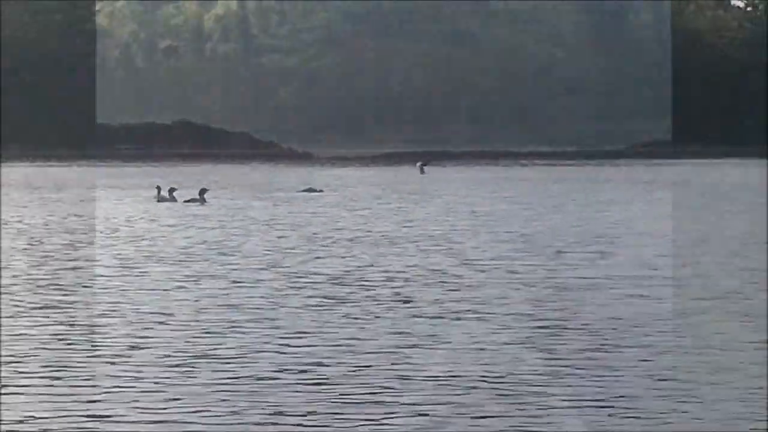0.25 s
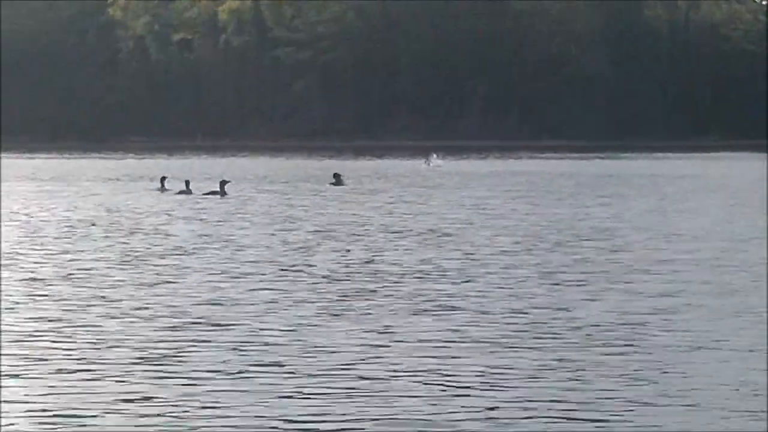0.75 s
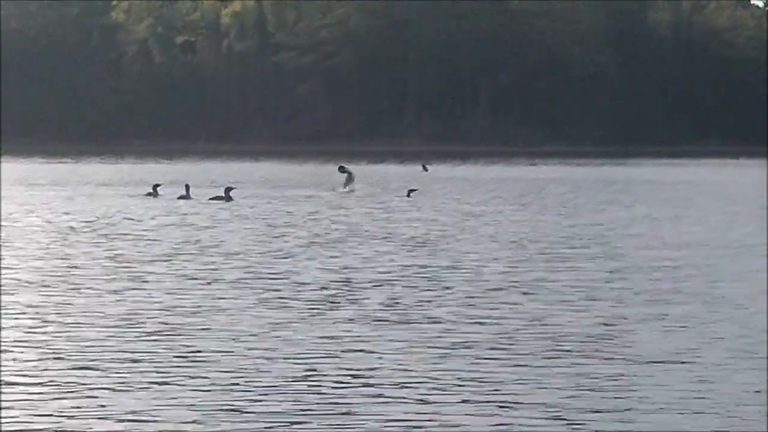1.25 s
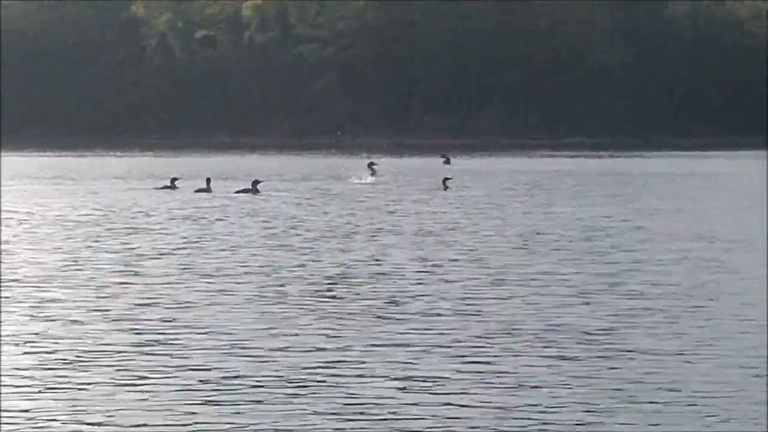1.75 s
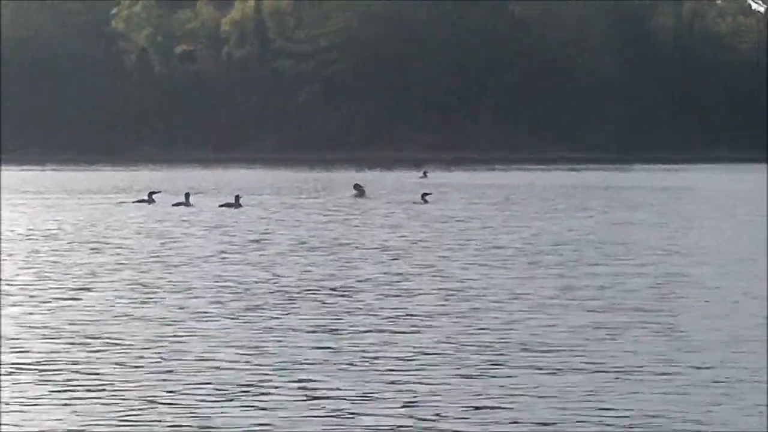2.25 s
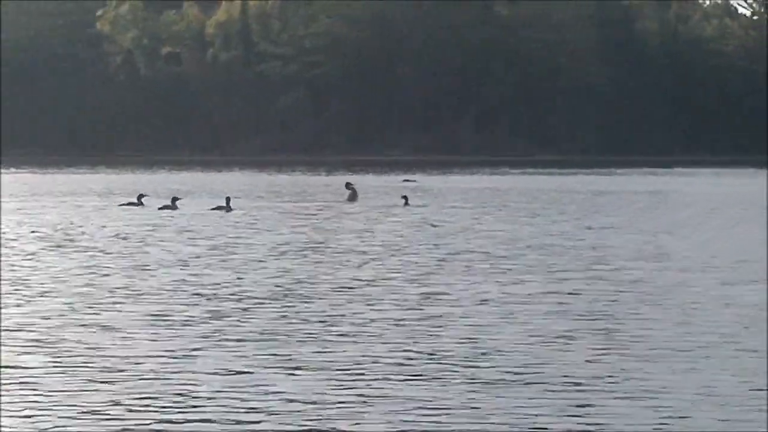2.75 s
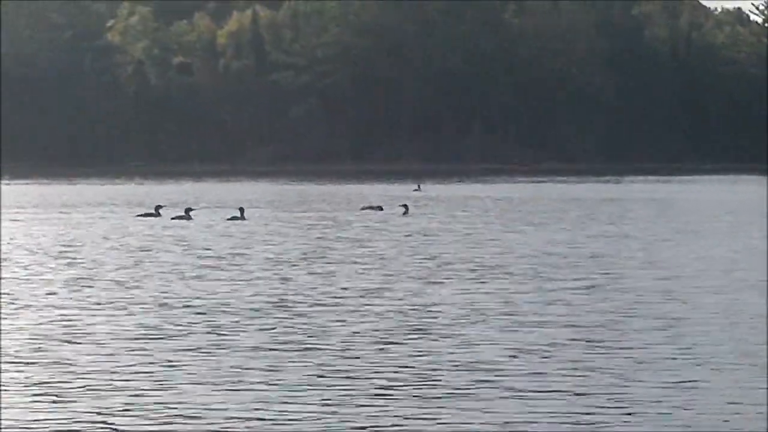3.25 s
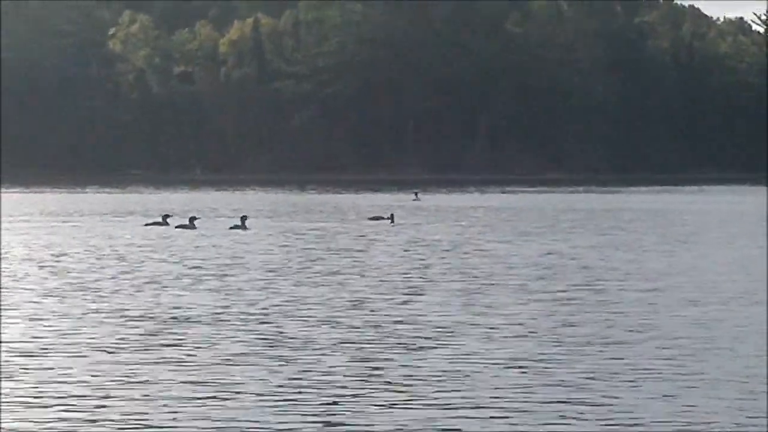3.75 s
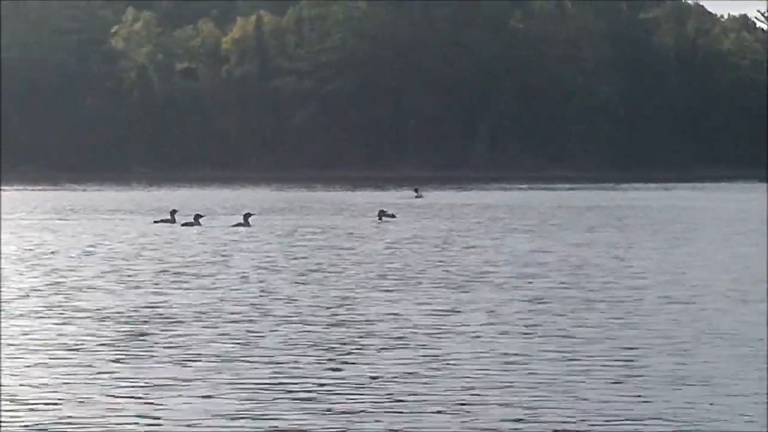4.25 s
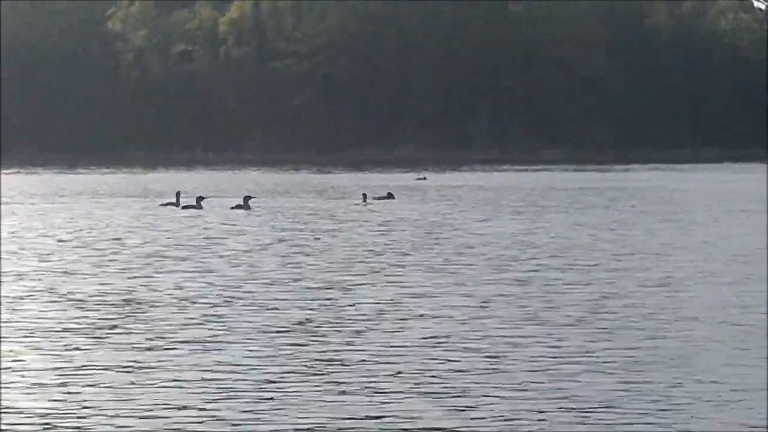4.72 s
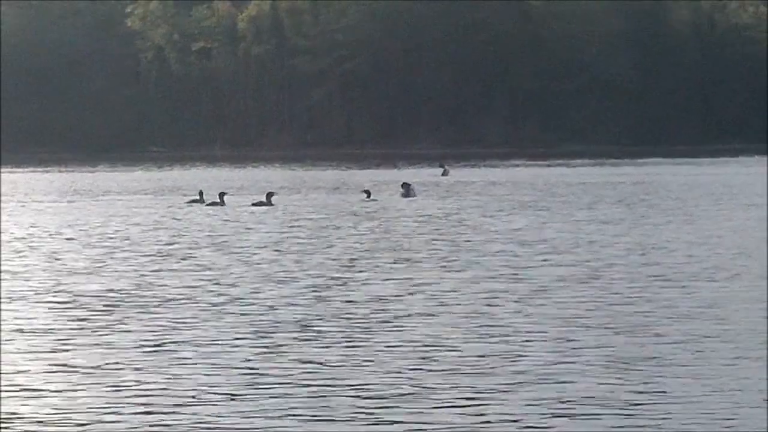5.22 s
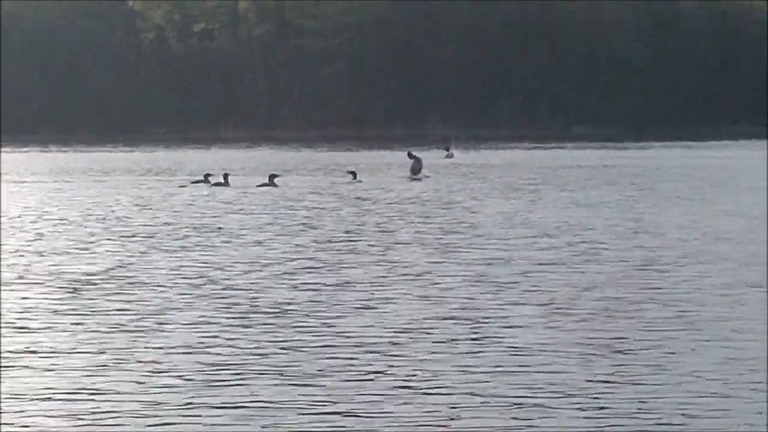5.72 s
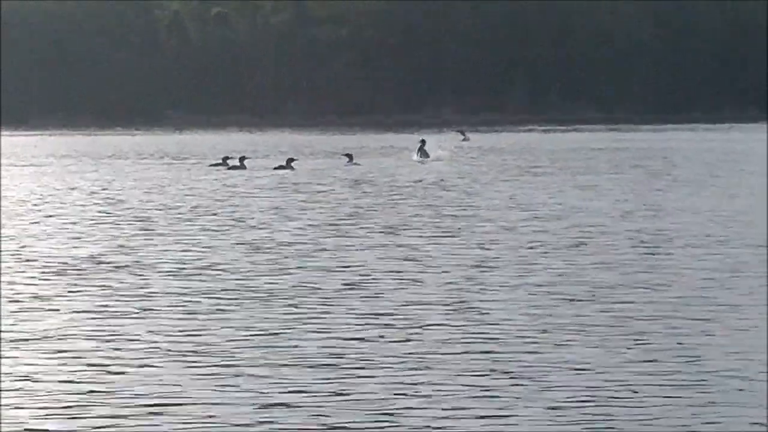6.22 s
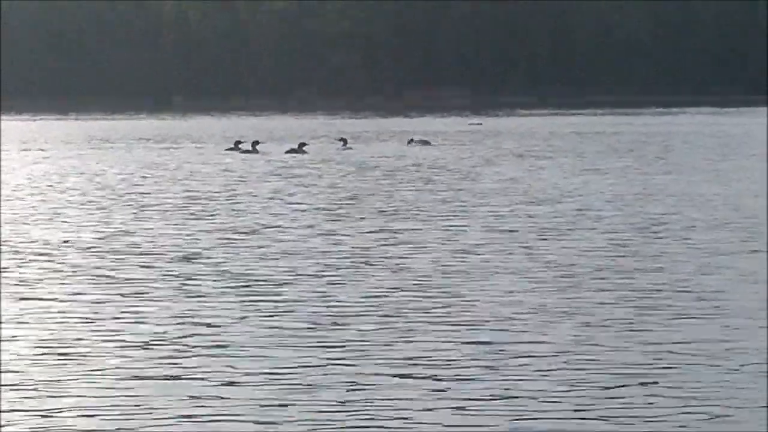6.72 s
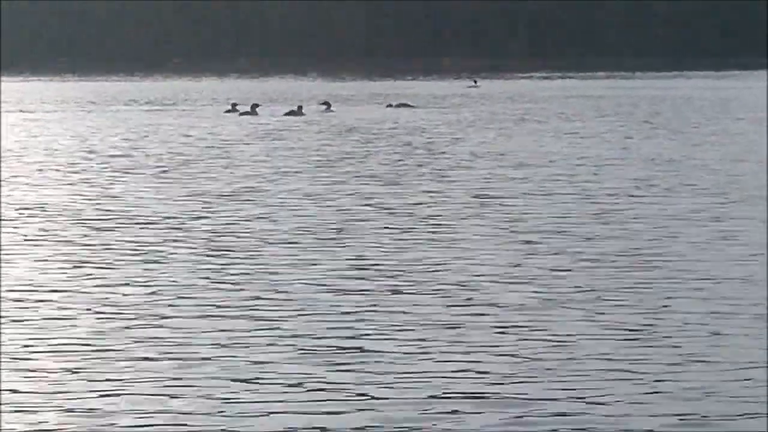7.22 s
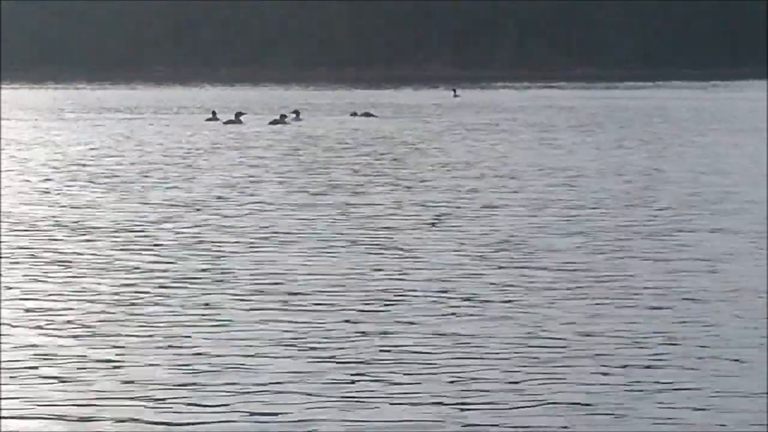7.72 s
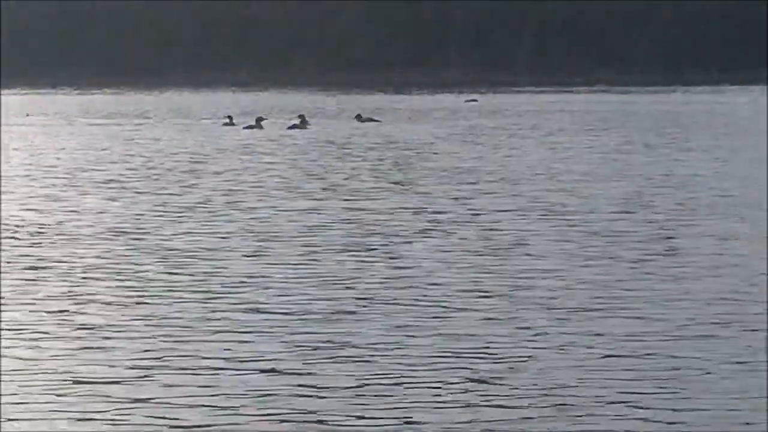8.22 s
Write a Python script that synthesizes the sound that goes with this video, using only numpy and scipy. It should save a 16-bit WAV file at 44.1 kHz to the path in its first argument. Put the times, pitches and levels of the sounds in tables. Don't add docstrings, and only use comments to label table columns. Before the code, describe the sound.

A brief trickle of water, then distant loons on a lake give quavering, yelping tremolo laughs around 900 to 1400 hertz. Wooded shores return a blurred echo. One bird slaps the water with small hollow knocks; after a short lull, louder rattling laughs overlap while wind thumps the outdoor microphone. More slaps follow, the calls thin out to faint high notes, and hiss with tiny creaks fades away.

```python
import sys
import numpy as np
from scipy import signal
from scipy.fft import rfft, irfft, next_fast_len
from scipy.io import wavfile
from scipy.ndimage import uniform_filter1d, map_coordinates

SR = 44100
rng = np.random.default_rng(int(sys.argv[2]) if len(sys.argv) > 2 else 0)


def materialize(psi):
    bounded = np.clip(np.atleast_2d(psi).T, -1, 1)
    quanta = np.round(bounded * 32767).astype(np.int16)
    wavfile.write(sys.argv[1], SR, quanta)


def level_to_linear(level):
    exponent = np.asarray(level, float) / 20
    return 10 ** exponent


N = 373682
TIME = np.arange(N) / SR


def loons():
    # [t/s, register name]
    laughs = [
        ([(.1, 879.5, 955, -54), (.182, 870, 1070, -51), (.266, 912, 1200, -56.5), (.352, 940, 1195, -50), (.448, 894, 1095, -52.5), (.55, 947, 1180, -47), (.657, 942, 1224, -45.5), (.752, 928, 1170, -47.5), (.85, 943, 1140, -46.5), (.945, 990, 1195, -53)], [(.134, "low"), (.311, "mid"), (.35, "low"), (.39, "mid"), (.445, "low"), (.589, "mid"), (.781, "high"), (.935, "mid"), (.995, "rest")]),
        ([(.36, 1090, 1250, -47), (.45, 1086, 1340, -54.5), (.542, 1070, 1310, -47), (.64, 1090, 1320, -53.5), (.73, 1090, 1300, -54), (.83, 1117, 1320, -54.5), (.965, 863, 1015, -46.5)], [(.425, "high"), (.457, "mid"), (.482, "high"), (.9, "rest"), (.987, "mid"), (1.046, "rest")]),
              ([(2.415, 980, 995, -48.5), (2.51, 897, 1240, -47), (2.605, 1044, 1335, -47.5), (2.702, 1048, 1335, -46.5), (2.801, 1003, 1325, -46), (2.899, 996, 1315, -48), (3.001, 967, 1280, -49.5), (3.115, 952, 850, -52.5)], [(2.446, "low"), (2.558, "mid"), (2.679, "high"), (2.706, "mid"), (2.748, "high"), (2.804, "mid"), (2.843, "high"), (2.901, "mid"), (2.943, "high"), (3.003, "mid"), (3.068, "high"), (3.097, "mid"), (3.116, "rest"), (3.13, "low"), (3.19, "rest")]),
        ([(3.68, 963, 1035, -50), (3.757, 956, 1215, -42.5), (3.835, 1035, 1345, -45.5), (3.93, 1040, 1320, -46.5), (4.024, 1050, 1305, -45.5), (4.12, 1070, 1310, -44), (4.218, 1052, 1285, -46.5), (4.33, 984, 1092, -47)], [(3.708, "low"), (3.793, "mid"), (3.884, "high"), (3.94, "mid"), (3.966, "high"), (4.234, "mid"), (4.255, "high"), (4.325, "mid"), (4.426, "rest")]),
        ([(3.76, 984, 1240, -47.5)], [(3.768, "mid"), (3.831, "rest")]),
              ([(4.36, 940, 1020, -46.5), (4.452, 884, 1250, -46), (4.547, 914, 1195, -38), (4.642, 920.6, 1220, -39), (4.735, 895, 1150, -39), (4.835, 869, 1020, -43.5), (4.94, 828, 900, -54.5)], [(4.4, "low"), (4.508, "mid"), (4.936, "low"), (4.977, "rest")]),
              ([(4.98, 915, 1131, -45), (5.064, 975, 1239, -46.5), (5.149, 975, 1300, -44), (5.24, 990, 1273, -47), (5.332, 940, 1135, -43.5), (5.43, 875, 840, -51)], [(4.982, "low"), (5.113, "mid"), (5.238, "low"), (5.289, "mid"), (5.333, "low"), (5.472, "rest")]),
        ([(5.075, 1080, 1398, -44), (5.152, 1040, 1310, -47), (5.243, 1045, 1314, -44), (5.335, 1075, 1322, -46.5), (5.432, 1040, 1294, -46), (5.535, 1020, 1275, -47.5), (5.652, 950, 1048, -46.5), (5.75, 900, 780, -56)], [(5.09, "low"), (5.138, "rest"), (5.153, "low"), (5.198, "rest"), (5.222, "high"), (5.248, "mid"), (5.275, "high"), (5.542, "mid"), (5.572, "high"), (5.635, "mid"), (5.665, "low"), (5.691, "mid"), (5.746, "low"), (5.772, "rest")]),
              ([(6.01, 880, 1182, -50), (6.097, 950, 1280, -48), (6.193, 1085, 1300, -45)], [(6.022, "low"), (6.055, "mid"), (6.168, "high"), (6.254, "rest")]),
        ([(6.285, 1425, 1495, -56), (6.38, 1430, 1513, -58), (6.47, 1430, 1510, -60)], [(6.287, "high"), (6.555, "rest")]),
        ([(6.575, 1200, 1280, -62)], [(6.566, "mid"), (6.66, "rest")]),
    ]
    # [from t/s, to t/s]
    rattling = [
        (.44, .53),
        (.865, .89),
        (2.7, 3.03),
        (3.7, 5.7),
    ]
    registers = {"low": (.75, 0.2, 0.83, 29, 8), "mid": (1.001, 0.41, 4.2, 4.4, 0.65),
                 "high": (1.24, -9.5, 1.5, -4, 7)}
    ceiling_hz, ceiling_edge = 1599, 23.86
    attack_s, release_s, overlap_s = .01, .016, .007
    upward_accent_db, accent_s = 2.5, .022
    rebound_db = 2.5
    flutter_db = 1.1
    out, patchy_db = np.zeros(N), 3 * wobble(30)

    def strains(t):
        return sum((t > start) & (t < end) for start, end in rattling)

    notes = []
    for strokes, jumps in laughs:
        earlier = [(0, "rest")] + jumps
        for (_, before), (start, register), (end, _) in zip(earlier, jumps, jumps[1:]):
            if register != "rest":
                notes.append((strokes, start, end, before, register))

    for strokes, start, end, before, register in notes:
        ratio, register_db, loss_db, catch_db, rich_db = registers[register]
        t = np.arange(start - attack_s / 4, end + overlap_s, 1 / SR)
        pitch, effort_db, height, near = tremolo(strokes, t)
        pitch = ratio * pitch
        limit = (1 + (pitch / ceiling_hz) ** ceiling_edge) ** (strains(t) / ceiling_edge)
        pitch = uniform_filter1d(pitch / limit, size=250, mode="nearest")
        accent_db = upward_accent_db * (before == "low") * np.exp(-np.abs(t - start) / accent_s)
        effort_db = effort_db + register_db + accent_db + rebound_db * (before == "high")
        effort_db = effort_db - loss_db * (1 - height) - catch_db * near
        ramp = np.minimum((t - t[0]) / attack_s, (t[-1] - t) / release_s)
        fade = np.sin(np.pi / 2 * np.clip(ramp, 0, 1)) ** 2
        strained = np.clip((pitch - 1440) / 70, 0, 1) * strains(t)
        patch_db = patchy_db[round(t[0] * SR):][:len(t)]
        tone = voice(pitch, effort_db, height, rich_db + accent_db + patch_db, strained)
        add(out, t[0], fade * level_to_linear(effort_db) * tone)
    return out * level_to_linear(flutter_db * wobble(45))


def voice(pitch, effort_db, height, rich_db, strained):
    # [f/Hz, level/dB]
    throat = [(600, -7), (800, 0), (950, -1.5), (1200, 8.5), (1320, 7.5), (1420, -1), (1600, 1.5),
              (1800, -4.5)]
    # [f/Hz, level/dB]
    upper = [(1250, -19), (1500, -17), (1700, -2), (1900, -13.5), (2100, -9.5), (2400, -11), (2800, -14),
             (4000, -37)]
    # [multiple of pitch, level/dB]
    overtones = [
        (2, -14.5),
        (3, -25),
    ]
    # [multiple of pitch, level/dB]
    rattle = [
        (0.499, -15),
        (0.752, -1),
        (1.251, -2.5),
        (1.501, -20.5),
    ]
    dull_trough_db = 7.5
    phase = 2 * np.pi * np.cumsum(pitch) / SR
    tone = level_to_linear(along(throat, pitch)) * np.sin(phase)
    rich_db = rich_db - dull_trough_db * (1 - height) + 0.09 * (effort_db + 52)
    for k, level_db in overtones:
        tone += level_to_linear(level_db + rich_db + along(upper, k * pitch)) * np.sin(k * phase)
    for k, level_db in rattle:
        tone += strained * level_to_linear(level_db + along(throat, pitch)) * np.sin(k * phase)
    return tone


def tremolo(strokes, t):
    last_stroke_s, last_sag = .095, .94
    longest_rise_s, catch_s, roundness = 0.04686, 0.0022, 1.7
    s, low_hz, crest_hz, db = np.transpose(strokes)
    s = np.r_[s, s[-1] + last_stroke_s]
    low_hz = np.r_[low_hz, low_hz[-1] * last_sag]
    crest_s = s[:-1] + np.minimum(np.diff(s) / 2, longest_rise_s)
    place = np.interp(t, np.sort(np.r_[s, crest_s]), np.arange(2 * len(s) - 1) / 2)
    height = np.abs(np.sin(np.pi * place)) ** roundness
    base = np.interp(t, s, low_hz)
    top = crest_hz[np.minimum(place.astype(int), len(db) - 1)]
    distance_s = np.min(np.abs(t - s[:, None]), axis=0)
    near = np.exp(-(distance_s / catch_s) ** 2)
    return base + (top - base) * height, np.interp(t, crest_s, db), height, near


def shore(birds):
    # [delay t/s, level/dB]
    returns = [(0, -58), (.03, -40), (.25, -42.5), (.8, -71), (1.1, -38), (1.4, -32.5), (1.8, -43),
               (2.2, -37), (2.6, -60)]
    # [f/Hz, level/dB]
    leaves = [(650, -30), (800, -8.5), (950, -3.5), (1150, -4.5), (1350, -2), (1600, 11.5), (1850, -8),
              (2300, -15)]
    delay, db = np.transpose(returns)
    t = TIME[:SR * 13 // 5]
    mid, side = rng.standard_normal((2, len(t))) * level_to_linear(np.interp(t, delay, db) - 25.5)
    stirred = birds * (0.76 + 0.72 * wobble(90))
    earlier = level_to_linear(-4) * stirred[round(3.5 * SR):][:SR]
    calls = np.r_[earlier, stirred]

    def scattered(m):
        return rfft(calls, m) * rfft([mid + 0.047 * side, mid - 0.054 * side], m)

    return coloured(scattered, lambda hz: level_to_linear(along(leaves, hz)))[:, SR:SR + N]


def splashing():
    # [t/s, peak level/dB, cavity f/Hz, spray level/dB]
    slaps = [(1.471, -52.5, 685, -17), (1.49, -52, 610, -11), (1.616, -47, 553, -18),
             (1.784, -57, 674, -28), (1.832, -62, 835, -23), (5.864, -42.5, 713, -9.5),
             (5.98, -46, 713, -41), (6.053, -48.5, 730, -29), (6.134, -48.5, 520, -38),
             (6.195, -59, 484, -22), (6.244, -53.5, 573, -26), (6.401, -56.5, 610, -24),
             (6.687, -65, 500, -13), (6.714, -62, 573, -22)]
    # [t/s, level/dB]
    churn = [
        [(1.38, -71.5), (1.854, -58), (2.1, -67.5)],
        [(5.95, -65.5), (6.232, -64.5), (6.6, -68.5)],
    ]
    # [f/Hz, level/dB per Hz]
    foam = [(120, 2), (250, -6), (600, -6), (1000, -9), (1500, -15.5), (3000, -36.5), (5000, -47)]
    out, t = np.zeros(N), np.arange(round(.04 * SR)) / SR

    def ring(hz, t60):
        return level_to_linear(-60 * t / t60) * (1 - np.exp(-t / 0.00024)) * np.sin(2 * np.pi * hz * t)

    for s, db, hz, spray_db in slaps:
        blow = ring(hz, 0.018) + level_to_linear(spray_db + 7.5) * ring(2330, 0.0042)
        add(out, s - .003, level_to_linear(db - 6.0) * blow)
        add(out, s, level_to_linear(db + 8.5) * blow)
        add(out, s + 0.00222, level_to_linear(db + 1) * blow)
    lumps = level_to_linear(3.9 * wobble(30) + 2.1 * wobble(90))
    churning = unit(lumps * noise(foam, [(500, 1.0)]))
    return out + sum(level(spell) for spell in churn) * level_to_linear(3.5) * churning


def ticks():
    # [t/s, peak level/dB, f/Hz, body level/dB]
    clicks = [
        (2.165, -49.5, 3200, -2.5),
        (5.6151, -54.5, 5300, -2),
        (7.7748, -65, 8200, 2),
        (8.3803, -62.5, 3610, -8),
    ]
    # [t/s, peak level/dB, length t/s]
    creaks = [
        (7.481, -64, 0.012),
        (7.532, -63.5, 0.014),
        (7.56, -75, 0.049),
    ]
    out, t = np.zeros(N), np.arange(round(.06 * SR)) / SR

    def band(lo_hz, hi_hz, x):
        sos = signal.butter(3, [lo_hz, hi_hz], "band", fs=SR, output="sos")
        return unit(signal.sosfilt(sos, x))

    for s, db, hz, body_db in clicks:
        click = band(hz / 1.5, hz * 1.6, rng.standard_normal(len(t)))
        add(out, s, level_to_linear(db - 60 * t / 0.011) * click)
        add(out, s, level_to_linear(db + body_db + 3 - 60 * t / 0.04) * np.sin(2 * np.pi * 1300 * t))
    rasps = band(2500, 3600, rng.standard_normal((len(creaks), len(t))))
    for (s, db, length), grit in zip(creaks, rasps):
        add(out, s, level_to_linear(db) * grit * np.sin(np.pi * np.clip(t / length, 0, 1)) ** .5)
    knock = (1 - np.exp(-t / 0.0018)) * np.sin(2 * np.pi * 900 * t)
    add(out, 7.537, level_to_linear(-54 - 60 * t / 0.036) * knock)
    return out


def wind():
    # [t/s, level/dB]
    buffets = [(0.0, -64), (0.12, -56), (0.82, -61.5), (1.27, -50), (1.6, -61), (2.29, -49.5), (2.41, -55),
               (2.88, -46.5), (3.87, -44), (3.96, -58), (4.03, -42.5), (4.29, -55.5), (4.39, -41.5),
               (4.53, -49.5), (8.47, -65.5)]
    # [f/Hz, level/dB per Hz]
    rumble = [(8.8, -37), (15, 3), (34, 0), (63, -5.5), (254, -34), (400, -38), (520, -38), (880, -120)]
    # [t/s, peak level/dB, f/Hz]
    gusts = [(0.708, -59.5, 160), (0.789, -60.5, 217), (0.842, -60.5, 254), (2.249, -60, 93.7),
             (3.078, -49, 92), (3.37, -48.5, 154.5), (3.679, -44, 90.3), (3.814, -41.5, 101),
             (4.367, -49, 92), (5.09, -54, 93), (8.399, -77, 126)]
    thumps, t = np.zeros(N), np.arange(round(0.048 * SR)) / SR
    for s, db, hz in gusts:
        swing = np.sin(2 * np.pi * hz * t * (0.817 + 6 * t))
        add(thumps, s - .01, level_to_linear(db - 1.0) * np.hanning(len(t)) * swing)
    lumps = level_to_linear(2.26 * wobble(9) + 2.9 * wobble(25))
    return thumps + level(buffets) * unit(lumps * noise(rumble, [(30, 0.95), (200, 1.0)]))


def brook():
    # [t/s, level/dB]
    trickle = [
        (0, -53),
        (.15, -62.5),
        (.38, -68),
        (.44, -79),
    ]
    # [f/Hz, level/dB per Hz]
    bubbles = [(710, -16.5), (1200, -12), (1320, -7), (1550, -6.5), (1940, -8.5), (2710, 0.5), (3510, -20),
               (5110, -29.5), (6500, -62), (8450, -83), (14300, -120)]
    bubbling = level_to_linear(1.9 * wobble(118.0)) * noise(bubbles, [(2500, .99)])
    return level(trickle) * level_to_linear(4.0) * unit(bubbling)


def background():
    # [f/Hz, level/dB per Hz]
    hiss = [(80, -34), (150, -6.5), (400, -12.5), (480, -28), (670, -33), (760, -14.5), (2000, -22),
            (3500, -26), (6000, -28), (14000, -32.5), (15000, -40)]
    # [f/Hz, correlation]
    alike = [(180, 0.97), (540, 0.98), (1610, 1), (4820, 0.74), (9500, 0.42), (14400, 0.68)]
    # [f/Hz, level/dB per Hz]
    hollow = [(400, -11), (480, -1.5), (660, -1), (760, -27)]
    # [from t/s, to t/s, bias toward full]
    filling = [(1.057, 1.45, 0.9), (1.992, 2.35, 3), (5.72, 5.95, -0.3), (6.491, 6.702, -0.2),
               (6.696, 7.281, -1), (7.377, 7.5, -2.5), (7.615, 7.812, -2.5), (7.923, 8.262, -3)]
    # [f/Hz, rms level/dB]
    whines = [
        (11090, -99),
    ]
    full_bias = 1.9
    whine = sum(level_to_linear(db + 3) * np.sin(2 * np.pi * hz * TIME) for hz, db in whines)
    bias = full_bias + sum((b - full_bias) * (TIME > start) * (TIME < end) for start, end, b in filling)
    fullness = np.clip(1.11 * wobble(25) + bias, 0, 1)
    fits = fullness * level_to_linear(-73) * noise(hollow, [(500, 0.99)])
    return level_to_linear(-66.5 + 0.43 * wobble(8)) * noise(hiss, alike) + fits + whine


def noise(spectrum, alike):
    top_hz = 15030

    def white(m):
        return rng.standard_normal((2, m // 2 + 1, 2)).view(complex)[..., 0]

    def response(hz):
        turn = np.arccos(np.clip(along(alike, hz), -1, 1)) / 2
        return level_to_linear(along(spectrum, hz)) * (hz < top_hz) * [np.cos(turn), np.sin(turn)]

    mid, side = coloured(white, response)[:, :N]
    return unit(np.array([mid + side, mid - side]))


def coloured(x, response):
    m = next_fast_len(N + 4 * SR, real=True)
    return irfft(x(m) * response(np.fft.rfftfreq(m, 1 / SR)), m)


def wobble(rate):
    coarse = TIME[::32]
    knots = rng.standard_normal(int(N * rate / SR) + 4)
    return np.interp(TIME, coarse, map_coordinates(knots, [coarse * rate]))


def unit(x):
    return x / np.sqrt(np.mean(x ** 2) + 1e-20)


def along(points, hz):
    f, v = np.transpose(points)
    return np.interp(np.log(hz + 1), np.log(f + 1), v)


def level(rows):
    s, db = np.transpose(rows)
    return level_to_linear(np.interp(TIME, s, db, left=-200, right=-200))


def add(track, s, sound):
    part = track[round(s * SR):][:len(sound)]
    part += sound[:len(part)]


def scene():
    # [t/s, gain]
    fading = [
        (0, .42),
        (1.55, 1),
        (6.15, 1),
        (8.47, .39),
    ]
    birds = loons()
    fade = np.interp(TIME, *np.transpose(fading))
    offset = np.array([[.022], [-.0229]])
    near = splashing() + ticks() + wind() + brook()
    surroundings = level_to_linear(-4.5) * shore(birds / fade) + background() + offset
    return birds + near + fade * surroundings


def band_limit(x):
    return signal.sosfilt(signal.butter(12, 15030, fs=SR, output="sos"), x)


def record(dry):
    return band_limit(dry)


dry = scene()
out = record(dry)
materialize(out)
```